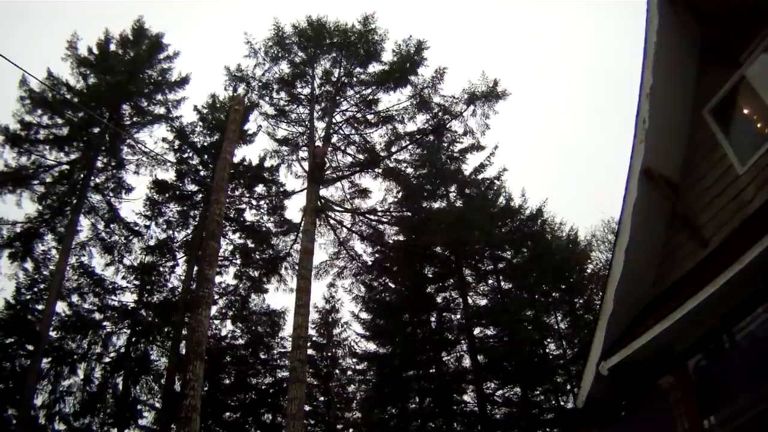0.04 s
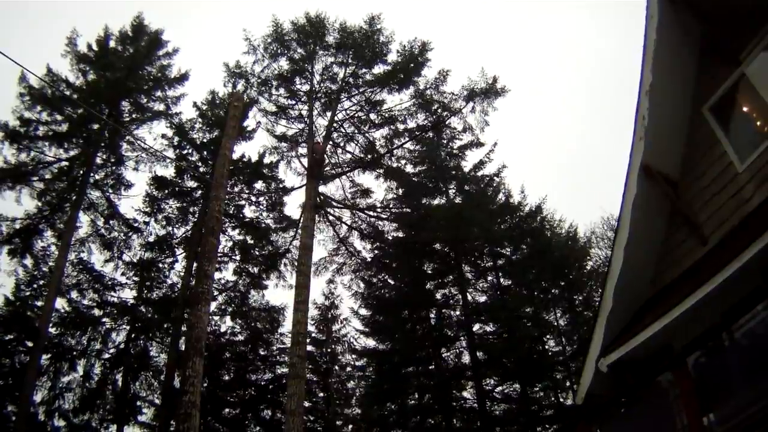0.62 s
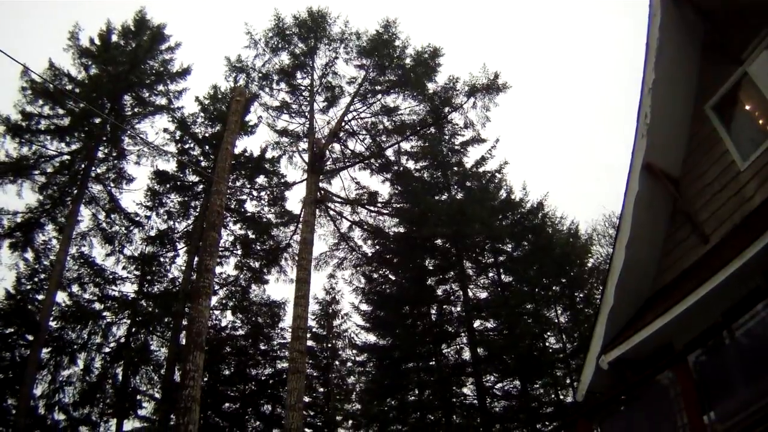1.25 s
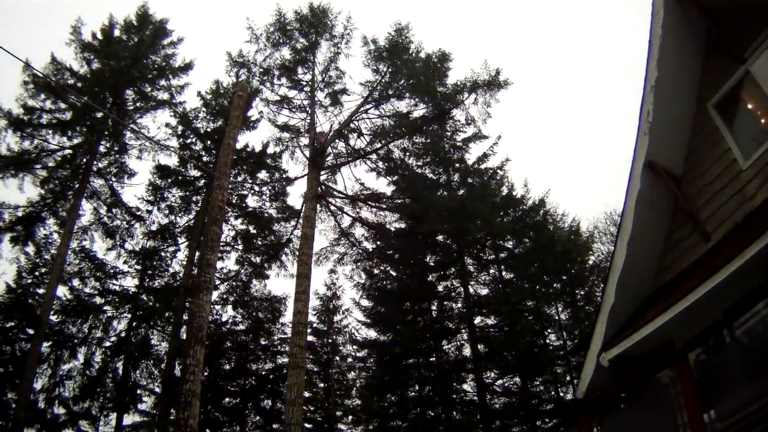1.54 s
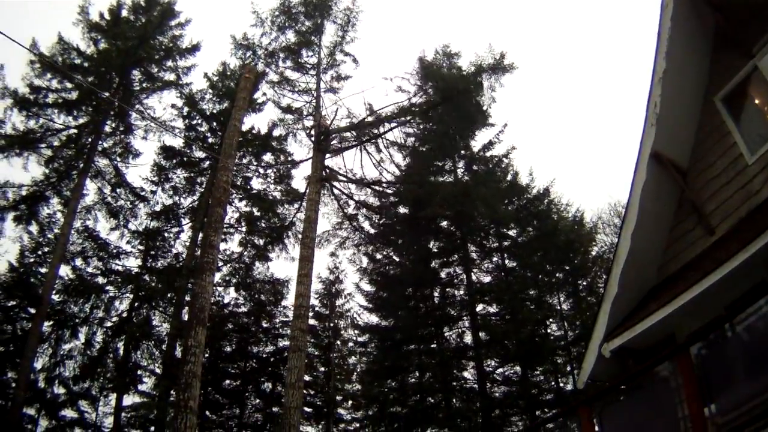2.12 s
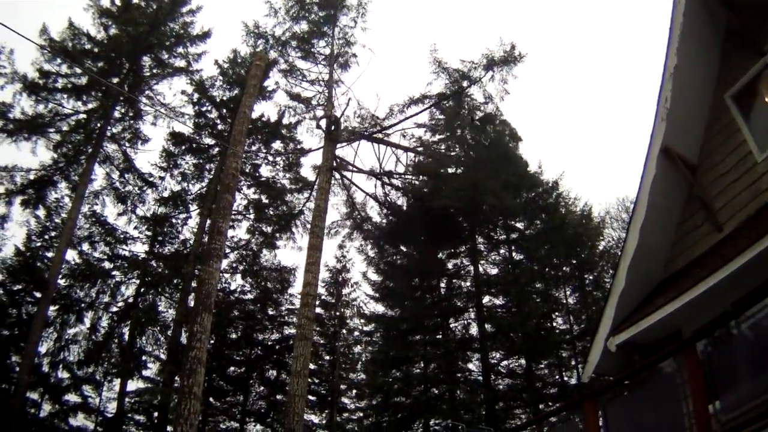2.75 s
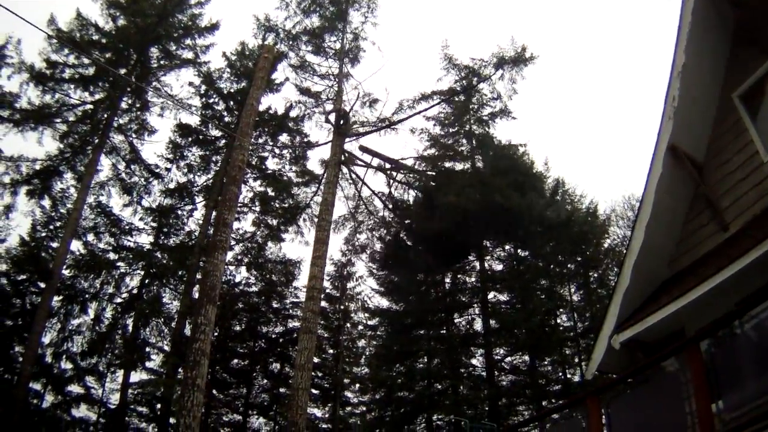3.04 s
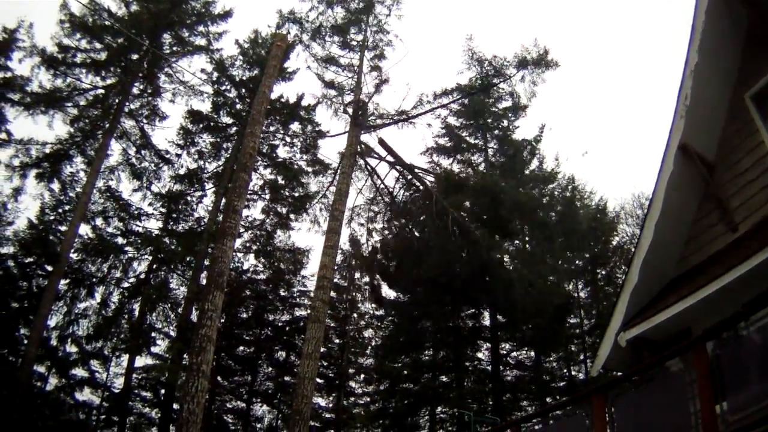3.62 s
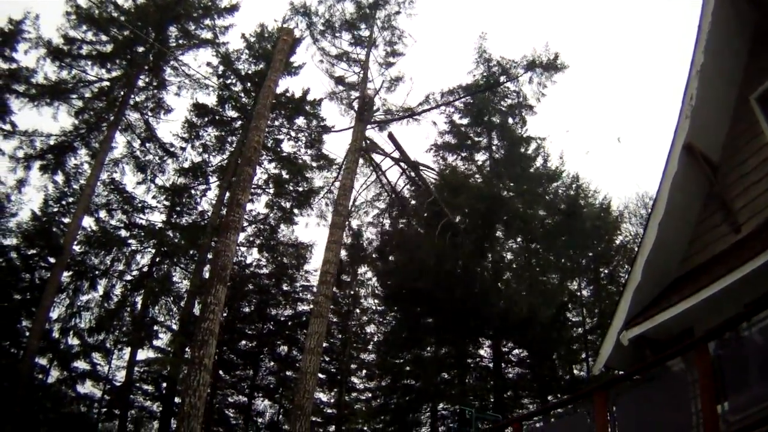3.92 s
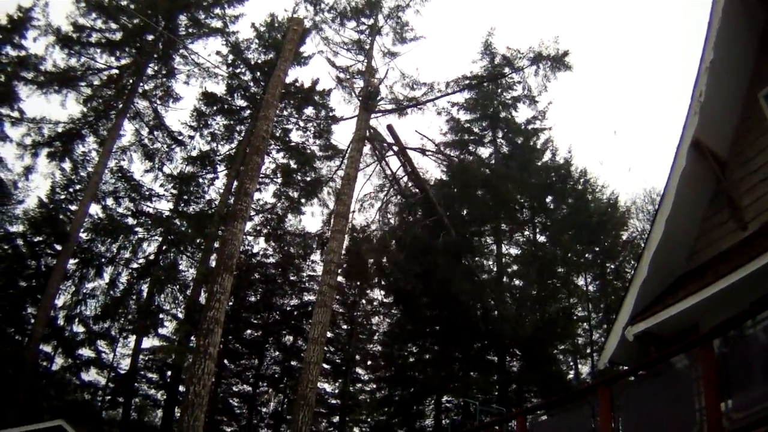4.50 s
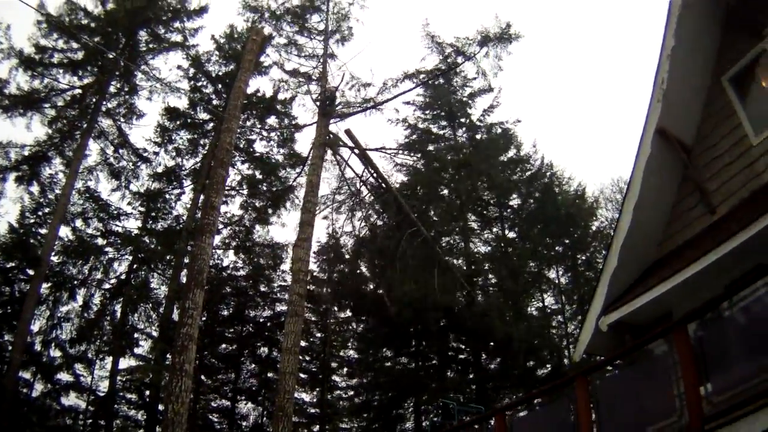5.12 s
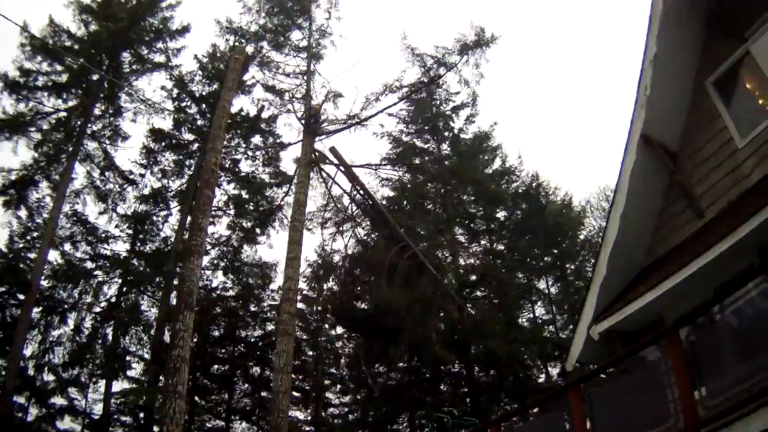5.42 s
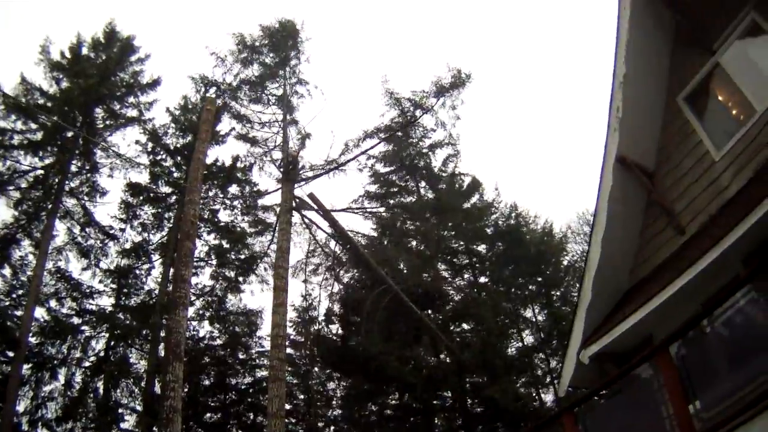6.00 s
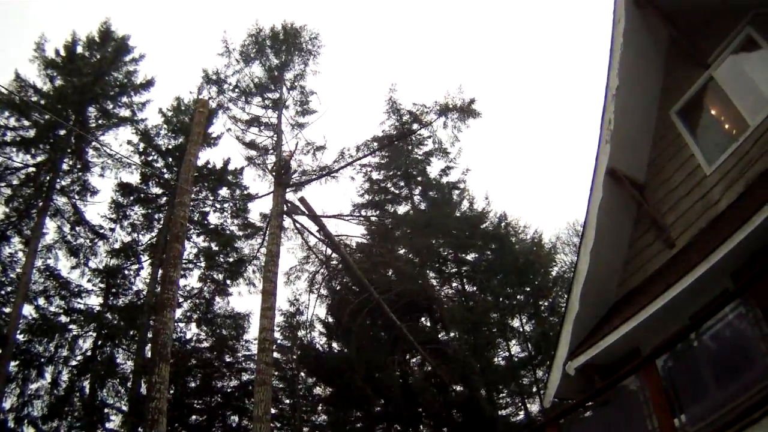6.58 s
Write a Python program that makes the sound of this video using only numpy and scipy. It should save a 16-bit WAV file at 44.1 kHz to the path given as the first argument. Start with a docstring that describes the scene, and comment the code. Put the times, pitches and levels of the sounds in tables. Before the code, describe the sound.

A distant chainsaw winds down as a treetop crashes through neighbouring trees, with loud wood cracks, snapping twigs and rustling boughs.

```python
"""Beside a house, the top of a tall fir is cut off and crashes down through its neighbours.
A distant engine hums throughout. A far chainsaw finishes the cut, and the hinge of uncut wood ticks.
Boughs sweep through needles, twigs snap, thick limbs tear, thud and burst, and bark scrapes on bark.
The house wall and the forest echo the breaking wood. Late in the fall the trunk knocks once and rings."""
import sys
import numpy as np
from scipy import signal
from scipy.fft import rfft, irfft
from scipy.io import wavfile
from scipy.ndimage import uniform_filter1d

SR = 44100
rng = np.random.default_rng(int(sys.argv[2]) if len(sys.argv) > 2 else 0)


def put_to_file(sound):
    """Save the sound as 16-bit audio at rate SR, in the file named by the first command-line argument."""
    columns = np.atleast_2d(sound).T  # one column per channel
    safe = np.clip(columns, -1, 1)
    whole_steps = np.round(safe * 32767)
    wavfile.write(sys.argv[1], SR, whole_steps.astype(np.int16))


N = 297675
TIME = np.arange(N) / SR


def undb(db):
    """Turn decibels into a gain to multiply by."""
    return 10 ** (np.asarray(db) / 20)


def unit(x):
    """Scale x to an average (rms) level of 1."""
    return x / np.sqrt(np.mean(x ** 2))


def add(out, s, x):
    """Mix x into out, starting at s seconds."""
    i = int(s * SR)
    out[i:i + len(x)] += x[:max(N - i, 0)]


def fade(t, t60):
    """Die away, falling 60 dB in t60 seconds."""
    return np.exp(-np.log(1000) * t / t60)


def ramp(start_s, rise_s):
    """Rise from 0 to 1 and stay there."""
    return np.clip((TIME - start_s) / rise_s, 0, 1)


def swells(rows):
    """A gain made of overlapping bell-shaped swells."""
    return np.sqrt(sum((undb(db) * np.exp(-((TIME - s) / half_s) ** 2)) ** 2 for s, db, half_s in rows))


def band(x, hz, octaves):
    """Keep what lies within so many octaves either side of hz."""
    edges = [hz / 2 ** octaves, min(hz * 2 ** octaves, SR / 2 - 1000)]
    return signal.sosfilt(signal.butter(2, edges, "bandpass", fs=SR, output="sos"), x)


def colour(x, points):
    """Shape the tone of x along a curve of (Hz, dB) points."""
    hz, db = np.transpose(points)
    f = np.fft.rfftfreq(len(x), 1 / SR) + 1
    return irfft(rfft(x) * undb(np.interp(np.log(f), np.log(hz), db)), len(x))


def resonate(x, modes):
    """Play x through the bands in which an object rings."""
    return sum(undb(db) * band(x, hz, np.log2(1 + width / hz / 2)) for hz, width, db in modes)


def ring(t, hz, t60, rise_cycles):
    """A tone that builds up over rise_cycles while it dies away."""
    turns = np.cumsum(hz * np.ones(len(t))) / SR
    return np.sin(2 * np.pi * turns) * fade(t, t60) * (1 - np.exp(-(turns / rise_cycles) ** 2))


def wander(per_s):
    """Drift smoothly between random values, roughly 1 either side of zero."""
    k = int(SR / per_s)
    return uniform_filter1d(np.repeat(rng.standard_normal(N // k + 1), k), k)[:N]


def clicks(per_s, spread_db):
    """Random clicks: many small ones, a few large."""
    size = undb(spread_db * np.minimum(rng.exponential(size=N), 3.5))
    return (rng.random(N) < per_s / SR) * size * rng.choice([-1, 1], N)


# The tone of the engine's rush. Each row: frequency in Hz, relative level in dB.
RUSH_TONE = [(25, -38), (60, -25), (100, -22.5), (200, -18), (420, -12.5), (700, -9.5), (1200, -7),
             (2600, -9.5), (3400, -12), (6300, -12.5), (8000, -21.5), (11000, -27.5), (14000, -38)]
# Where its housing rings. Each row: pitch in Hz, width in Hz, relative level in dB.
HOUSING_RINGS = [(50, 18, -15.5), (138, 25, -13.5), (837, 42, -6.5), (1208, 93, -1.5), (1361, 68, 1),
                 (1417, 42, 4), (1900, 99, -1), (2500, 450, -5.5)]
def engine(rush_db=-44.5, housing_db=-49, shaft_hz=49.15, throb_hz=5.9):
    """A distant engine rushes steadily; its housing rattles once a turn and throbs slowly."""
    rush = unit(colour(rng.standard_normal(N), RUSH_TONE)) * undb(rush_db + 0.072 * wander(6.1))
    turns = np.cumsum(shaft_hz * (1 + 0.01 * wander(2.03))) / SR
    shaking = np.exp(0.43 * np.cos(2 * np.pi * turns) + 0.16 * np.cos(2 * np.pi * throb_hz * TIME))
    rattle = unit(resonate(shaking * rng.standard_normal(N), HOUSING_RINGS))
    return rush + undb(housing_db) * rattle


def throttle(cut_hz=223.3, idle_hz=88.5, settle_s=0.27, release_s=1.52, rundown_s=0.24):
    """The saw settles, is let go and runs down. Gives its firing rate and the octaves it has run down."""
    running_hz = cut_hz + 17 * np.exp(-TIME / settle_s)
    hz = idle_hz + (running_hz - idle_hz) * np.exp(-np.maximum(TIME - release_s, 0) / rundown_s)
    return hz, np.log2(running_hz / hz)


# The tone of the saw's exhaust. Each row: frequency in Hz, relative level in dB.
EXHAUST_TONE = [(100, 1.5), (220, -5), (330, 8), (450, 0.5), (700, -13), (1500, 0.5), (4000, -25)]
# Where the chain rings the saw's bar. Each row: pitch in Hz, width in Hz, relative level in dB.
BAR_RINGS = [(2550, 420, 6), (4040, 1000, 5), (5500, 1250, 7.5), (6260, 390, 1), (8600, 500, -1.5),
             (10900, 500, -11), (11800, 600, -9)]
def chainsaw(exhaust_db=-55, chain_db=-44):
    """Firings drone through the exhaust; cutters ring the bar at half that rate."""
    hz, octaves_down = throttle()
    phase = 2 * np.pi * np.cumsum(hz * (1 + 0.005 * wander(25.1))) / SR
    firings = sum(np.cos(k * phase) / np.sqrt(k) for k in range(1, 9))
    rasp = undb(-3) * unit(band(rng.standard_normal(N), 350, 0.61))
    exhaust = unit(colour(firings, EXHAUST_TONE)) + rasp
    bites = np.exp(0.48 * np.cos(phase / 2) + 0.35 * np.cos(phase / 4))  # left and right bite unequally
    chain = unit(resonate(bites * rng.standard_normal(N), BAR_RINGS))
    # Both grow louder as the saw bites in, and quieter as it runs down.
    load = ramp(start_s=0.49, rise_s=0.56)
    exhaust_gain = undb(exhaust_db + 3 * load - 24 * octaves_down)
    chain_gain = load * undb(chain_db - 40 * octaves_down)
    return exhaust_gain * exhaust + chain_gain * chain


# Spells of small snaps. Each row: start and end in seconds, snaps a second, level in dB, pitch in Hz.
CRACKLE_SPELLS = [(0.954, 2.0, 10, -24.5, 5600), (2.55, 5.0, 7.14, -16.5, 5400),
                  (4.999, 6.7, 4, -17.5, 5960)]
def small_snaps(splinter_db=-3):
    """The hinge, then twigs, give way at uneven moments. Gives extra rows for snaps() to play."""
    rows = []
    for start, end, per_s, db, hz in CRACKLE_SPELLS:
        for k, (when, softer, pitch) in enumerate(rng.uniform(-1, 1, size=(64, 3))):
            s = start + (k + (1 + when) / 2) / per_s
            if s < end:
                rows.append((s, db - 0.5 * softer, hz * 2 ** (0.25 * pitch), splinter_db))
    return rows


# The hinge ticks, then branches snap.
# Each row: start in seconds, level in dB, pitch in Hz, relative splintering in dB.
WOOD_SNAPS = [(1.3671, -22.5, 5184, -13), (1.457, -21, 5700, -7), (1.5513, -18, 4210, -9),
              (1.7586, -25, 8000, -10), (2.2414, -19, 8000, -9), (2.2791, -20.5, 2720, -3),
              (2.3574, -19, 5000, -13), (2.4622, -1, 3700, -13), (2.4774, -5.5, 4000, -7),
              (2.643, -8, 3840, -14), (2.805, -5, 3950, -6), (2.8328, -5, 3800, -18),
              (2.89, -11, 4060, -17), (2.9677, -11.5, 5200, -19), (3.2078, -7, 4800, -7),
              (3.2654, -9, 2900, -4), (3.2844, -3.5, 6660, -8), (3.3077, -11, 5070, -11),
              (3.402, 1, 2650, 1), (3.4331, 2.5, 2330, -0.5), (3.4789, -1.5, 3470, -13),
              (3.5814, -5.5, 5350, -15), (4.0141, -5.5, 4900, -8), (4.05, -8.5, 3570, -12),
              (4.2276, 1.5, 2880, 3.5), (4.2545, -0.5, 2140, -3), (4.324, -7.5, 5030, -14),
              (4.3642, -10.5, 4970, -3), (4.523, -16, 6000, -17), (4.6092, -13, 6260, -4),
              (4.6838, -9.5, 4550, -6), (4.9395, -9.5, 4170, -2), (5.2662, -12, 5440, -10),
              (5.5766, -18.5, 3720, 1), (5.864, -15.5, 4670, 6), (6.1769, -12, 2160, -7),
              (6.2676, -6, 7100, -3), (6.4876, -3.5, 4740, -3), (6.5132, -6, 5500, 10),
              (6.644, -8, 5460, 2)]
def snaps(echo, body_hz=1500, gain_db=1.5):
    """Each snap is one sharp pulse with a woody body, then a brief splintering of smaller fibres."""
    out, t = np.zeros(N), TIME[:2048]
    for s, db, hz, splinter_db in WOOD_SNAPS + small_snaps():
        push = rng.standard_normal(len(t)) ** 3 * fade(t, t60=0.017)  # cubing makes the noise spiky
        push *= undb(splinter_db - 1) / np.linalg.norm(push)
        push[0] = 1  # the sharp pulse
        crack = band(push, hz, 0.63) - undb(-9) * band(push, body_hz, 0.86)
        crack *= undb(db + gain_db) / np.abs(crack).max()
        echo_db = np.interp(s, [4.5, 6.5], [-3, -6])  # from low boughs, less sound reaches far trunks
        add(out, s, echo(crack, s, echo_db))
    return out


# The wall's echo as the treetop sinks. Each row: time in seconds, delay in seconds, level in dB.
WALL_ECHO = [(2.4, 0.0093, -7), (2.8, 0.0074, -3.5), (3.4, 0.0085, -11.5), (4.7, 0.0071, -3.5),
             (5.3, .008, -25), (6.2, 0.011, -23)]
# The tone of sound scattered by trees. Each row: frequency in Hz, relative level in dB.
SCATTER_TONE = [(100, -9), (500, -6.5), (1200, 1), (3000, 2), (6000, 2.5), (9000, 0.5), (14000, -7.5)]
def wall_and_forest(near_db=-6, near_t60=0.28, far_db=-9, far_t60=0.91):
    """Build the echo: one sharp bounce off the house, and a wash from near trunks and deeper woods."""
    t = TIME[:24576]
    scatter = unit(colour(rng.standard_normal(N), SCATTER_TONE))
    near, far = (fade(t, t60) * (1 - np.exp(-t / 0.001)) for t60 in (near_t60, far_t60))
    tail = np.hypot(undb(near_db) * near / np.linalg.norm(near), undb(far_db) * far / np.linalg.norm(far))
    times, delays, wall_db = np.transpose(WALL_ECHO)

    def echo(x, s, echo_db=0):
        """Give x its echo at s seconds. Every break happens somewhere else, so it meets other trunks."""
        start = rng.integers(N - len(t))
        response = tail * scatter[start:start + len(t)]
        delay = int(np.interp(s, times, delays) * SR)
        response[delay] += undb(np.interp(s, times, wall_db))
        response *= undb(echo_db)
        response[0] += 1  # the direct sound
        return signal.fftconvolve(x, response)
    return echo


def burst(db, hz, octaves, t60, rise_s=0.00018):
    """A band of noise that starts suddenly and dies away."""
    t = TIME[:8192]
    noise = unit(band(rng.standard_normal(len(t)), hz, octaves))
    return undb(db) * noise * fade(t, t60) * (1 - np.exp(-t / rise_s))


# Limbs tearing. Each row: start in seconds, level in dB, pitch in Hz, octaves to either side.
LIMB_TEARS = [(2.279, -33.5, 2260, .16), (2.463, -29.5, 2250, 0.17), (3.361, -15.5, 2770, 0.84),
              (3.402, -19.5, 1500, .93), (3.434, -12.5, 3260, 1.04), (4.229, -21, 1090, 1),
              (4.254, -15, 1900, 1.44), (4.292, -20.5, 2820, 1.1), (4.94, -26.5, 4170, .15),
              (5.266, -14.5, 4830, 0.31), (5.266, -17.5, 1950, 1), (6.197, -24.5, 4260, .93),
              (6.481, -21.5, 4500, 0.96)]
def tears(echo):
    """Fibres rip along the grain in a dense burst; thin limbs ring in a narrow band."""
    out = np.zeros(N)
    for s, db, hz, octaves in LIMB_TEARS:
        add(out, s, echo(burst(db, hz, octaves, t60=0.065), s))
    return out


# Single boughs whipping past. Each row: middle in seconds, level in dB, half length in seconds.
BOUGH_SWISHES = [(2.3, -40.5, 0.031), (2.95, -43, 0.044), (3.55, -36, 0.11), (4.08, -43.5, .08),
                 (5.38, -41, 0.075), (6.23, -39, .16)]
# The tone of brushing needles. Each row: frequency in Hz, relative level in dB.
NEEDLE_TONE = [(120, -25.5), (450, -12.5), (900, -10.5), (1600, -7.5), (3000, -4), (6300, 1), (9000, -7),
               (14000, -17.5)]
def boughs(sweep_db=-36.5, twig_db=-7, flutter_db=1.2, slows_s=3.85, fall_db_per_s=4):
    """Needles brush in countless tiny ticks and thin twigs crackle, fading as the treetop slows."""
    needles = unit(colour(clicks(12000, 4.5), NEEDLE_TONE)) * undb(flutter_db * wander(25))
    twigs = sum(band(clicks(130, 16), hz, 0.6) for hz in (2600, 4200, 6000))
    twigs = unit(colour(twigs, [(6500, -2), (9000, -7), (14000, -5)]))  # foliage dulls the hidden twigs
    slowing_db = fall_db_per_s * np.maximum(TIME - slows_s, 0)
    sweep = ramp(start_s=2.41, rise_s=0.62) * undb(sweep_db - slowing_db)
    return np.hypot(sweep, swells(BOUGH_SWISHES)) * (needles + undb(twig_db) * twigs)


# Heavy wood hitting boughs and stems. Each row: start in seconds, level in dB, pitch in Hz.
WOOD_THUDS = [(2.463, -39, 300), (2.639, -38, 650), (2.805, -39.5, 1000), (3.134, -39.5, 700),
              (3.364, -30, 463), (3.436, -18, 532), (4.253, -33, 336), (5.265, -16.5, 510),
              (5.722, -34, 620), (6.177, -39.5, 330), (6.39, -40.5, 600)]
def thuds(echo, soft_db=-40.5, hard_db=-22):
    """A soft blow thuds long and broad, a hard one short and focused."""
    out = np.zeros(N)
    for s, db, hz in WOOD_THUDS:
        octaves = np.interp(db, [soft_db, hard_db], [1.13, 0.44])
        t60 = np.interp(db, [soft_db, hard_db], [0.16, 0.083])
        add(out, s, echo(burst(db, hz, octaves, t60), s))
    return out


# Thick limbs letting go. Each row: start in seconds, level in dB, final pitch in Hz.
LIMB_BREAKS = [(3.402, -8, 2020), (3.4318, 0, 2170), (3.4335, -2.5, 595), (3.4344, -8, 431),
               (4.2271, -4.5, 2570), (4.2513, -4, 904), (4.2559, -1.5, 1115)]
def breaks(echo, glide_s=0.00097, fade_cycles=14):
    """A loaded limb parts with a short yelp that drops in pitch."""
    out, t = np.zeros(N), TIME[:8192]
    for s, db, final_hz in LIMB_BREAKS:
        hz = final_hz * (1 + 0.435 * np.exp(-t / glide_s))
        yelp = undb(db) * ring(t, hz, t60=fade_cycles / final_hz, rise_cycles=0.76)
        add(out, s, echo(yelp, s, echo_db=-5))
    return out


# Bark scraping. Each row: middle in seconds, level in dB, half length in seconds.
BARK_SCRAPES = [(3.54, -34, 0.12), (4.0, -46.5, 0.31)]
def scrapes():
    """Bark rubs on bark in tiny jerks."""
    rubbing = unit(band(clicks(per_s=1500, spread_db=3.5), hz=1230, octaves=0.17))
    return rubbing * swells(BARK_SCRAPES) * undb(1.5 * wander(20))


# The notes of the bending trunk. Each row: pitch in Hz, level in dB, seconds to fade by 60 dB.
TRUNK_NOTES = [(101, -34.5, 0.61), (178, -25, 0.21), (205, -28.5, 0.35), (295, -39.5, 0.46),
               (360, -24.5, 0.19), (444, -24.5, 0.2), (512, -28.5, 0.28), (690, -15, 0.07)]
def trunk(knock_s=5.266):
    """The trunk hits a neighbour and rings like a wooden bar; its lowest note builds and fades slowest."""
    out, t = np.zeros(N), TIME[:SR]
    add(out, knock_s, sum(undb(db) * ring(t, hz, t60, rise_cycles=2.2) for hz, db, t60 in TRUNK_NOTES))
    return out


def scene():
    """Mix the falling treetop, the saw and the engine into one channel."""
    echo = wall_and_forest()
    echoing_wood = snaps(echo) + breaks(echo) + tears(echo) + thuds(echo)
    return (echoing_wood + boughs() + scrapes() + trunk() + chainsaw() + engine())[None]


def record(dry, bass_hz=32, top_hz=15000):
    """Clip the loudest cracks, then cut the deep bass and the highest treble."""
    clipped = np.clip(dry, -0.9, 0.9)
    thinned = signal.sosfilt(signal.butter(2, bass_hz, "highpass", fs=SR, output="sos"), clipped)
    return signal.sosfilt(signal.ellip(8, 0.2, 70, top_hz, fs=SR, output="sos"), thinned)


dry = scene()
out = record(dry)
put_to_file(out)
```